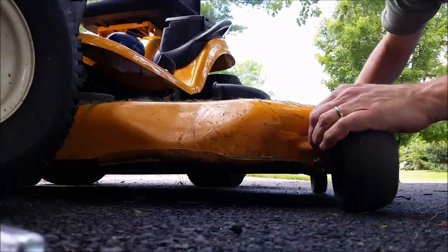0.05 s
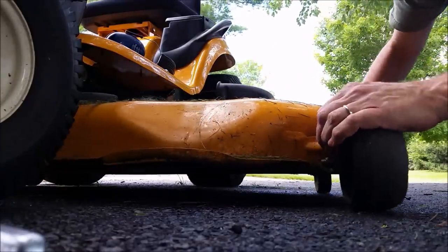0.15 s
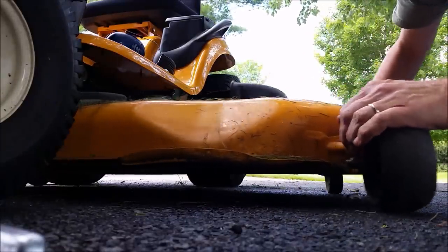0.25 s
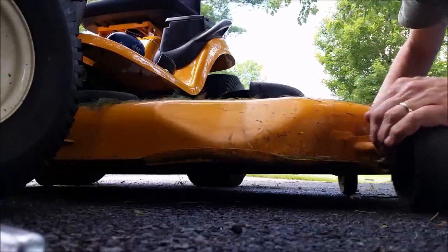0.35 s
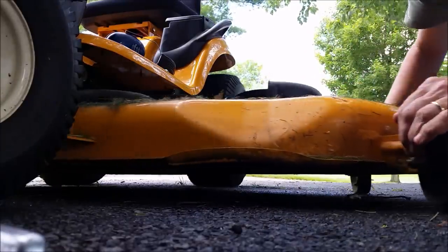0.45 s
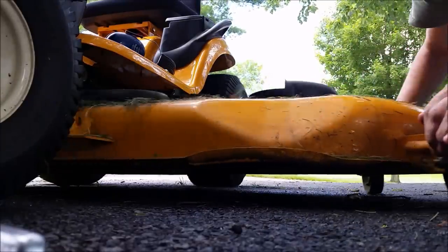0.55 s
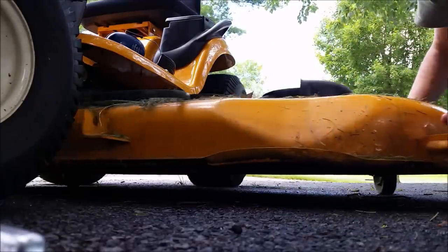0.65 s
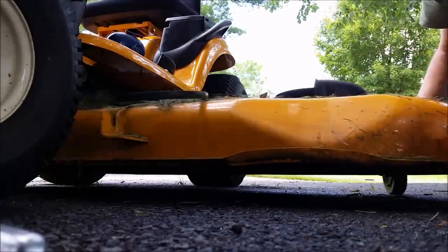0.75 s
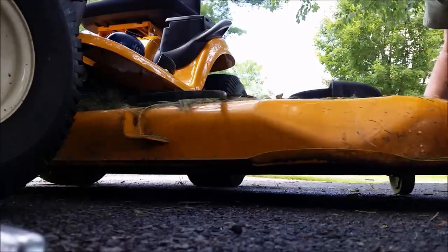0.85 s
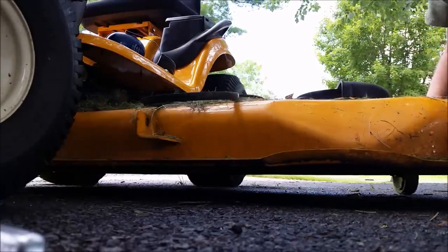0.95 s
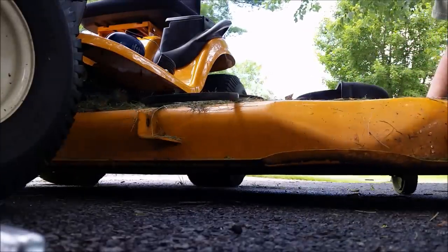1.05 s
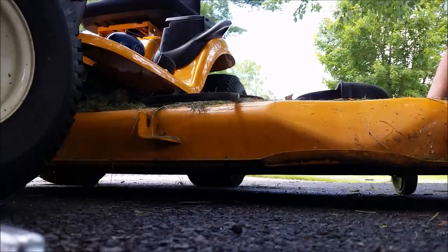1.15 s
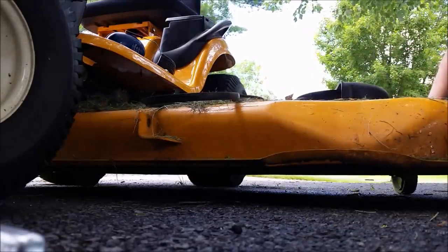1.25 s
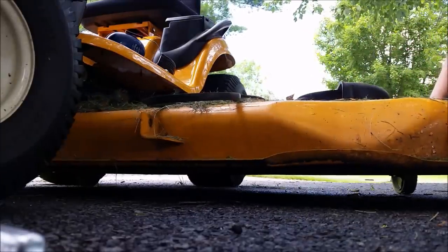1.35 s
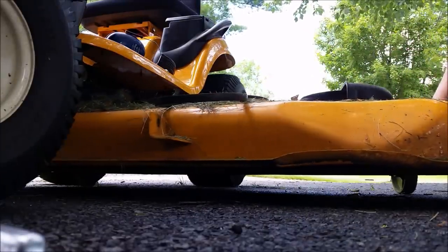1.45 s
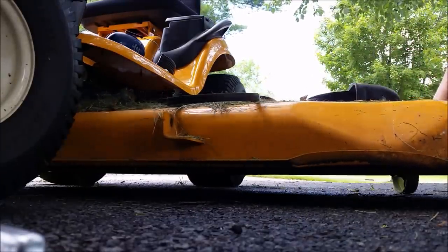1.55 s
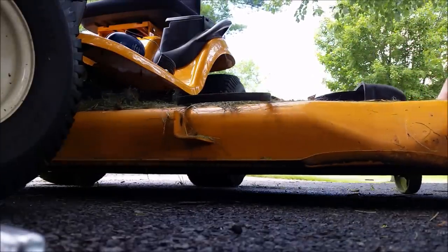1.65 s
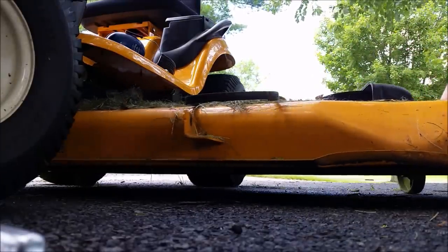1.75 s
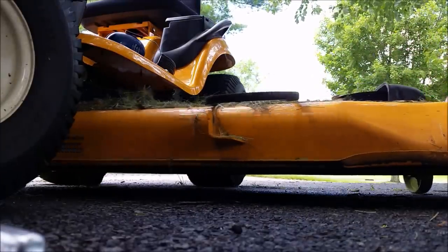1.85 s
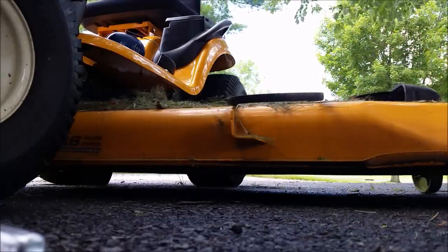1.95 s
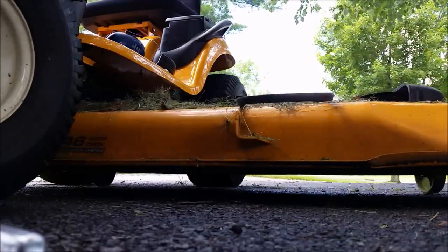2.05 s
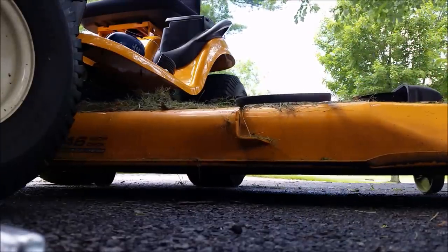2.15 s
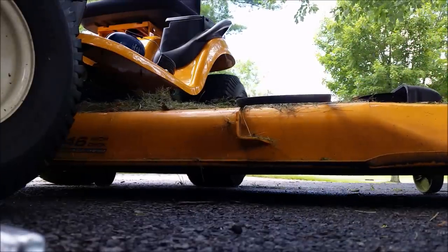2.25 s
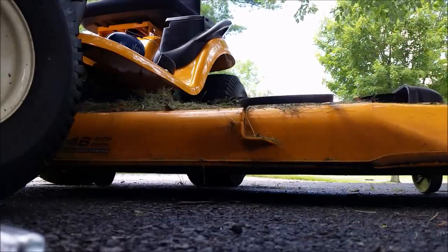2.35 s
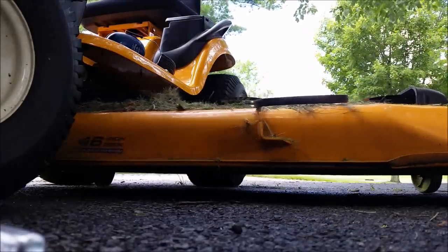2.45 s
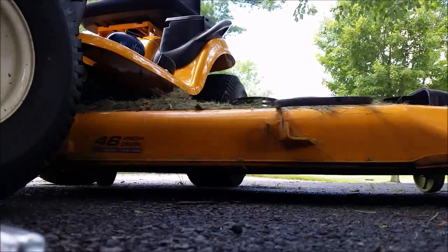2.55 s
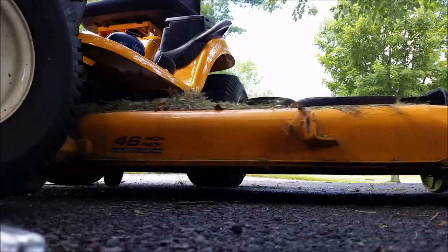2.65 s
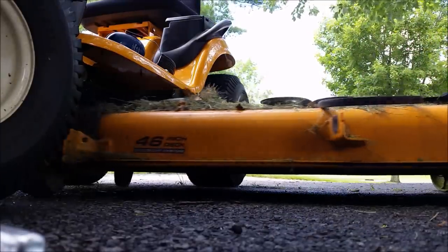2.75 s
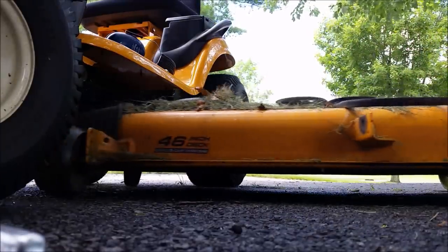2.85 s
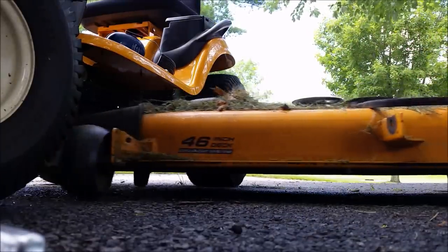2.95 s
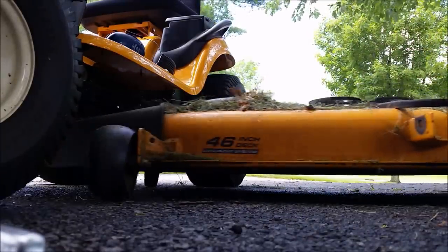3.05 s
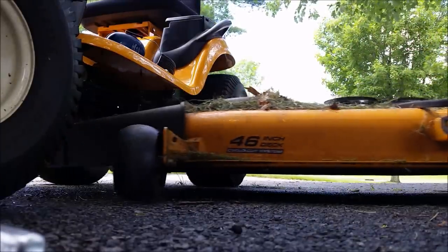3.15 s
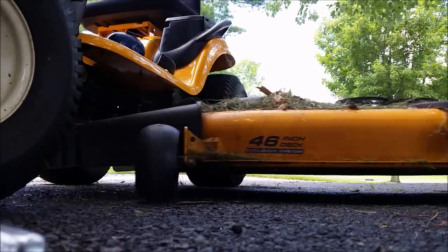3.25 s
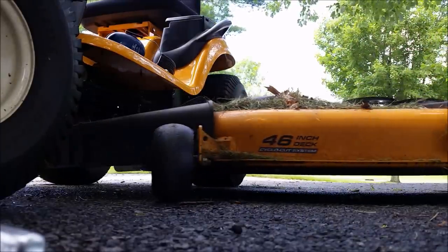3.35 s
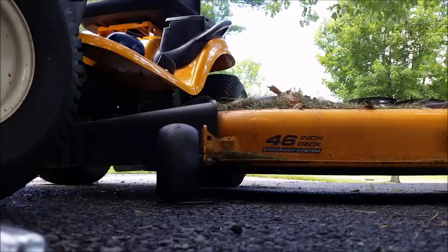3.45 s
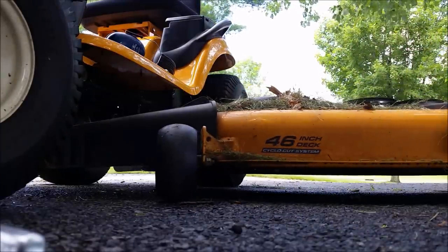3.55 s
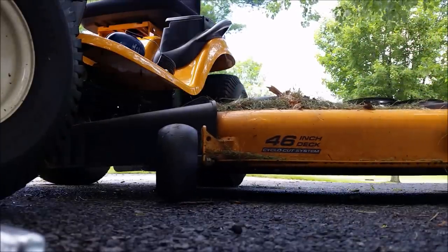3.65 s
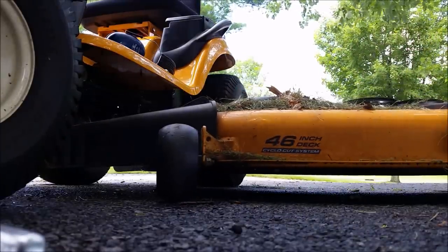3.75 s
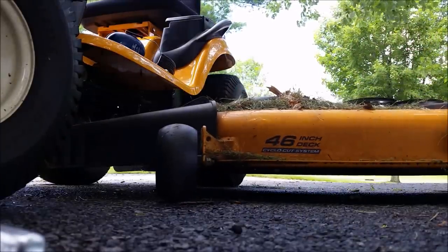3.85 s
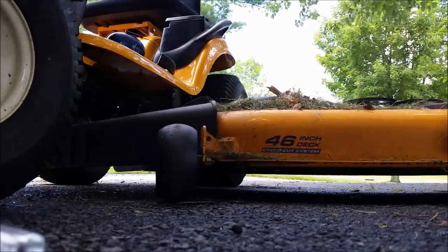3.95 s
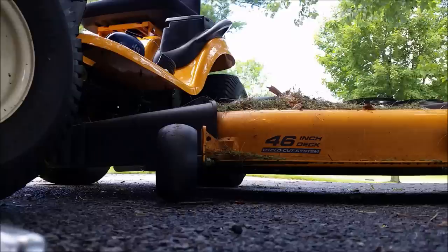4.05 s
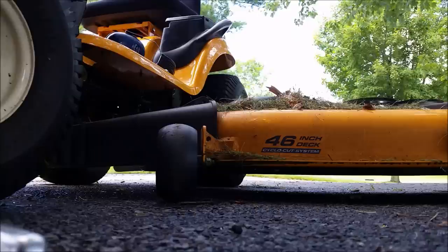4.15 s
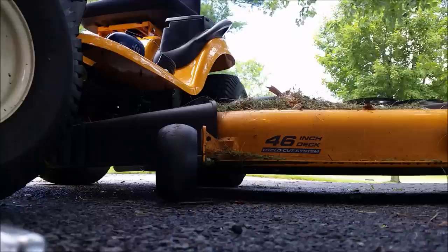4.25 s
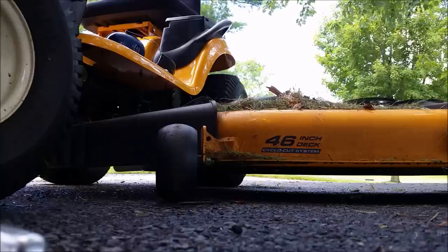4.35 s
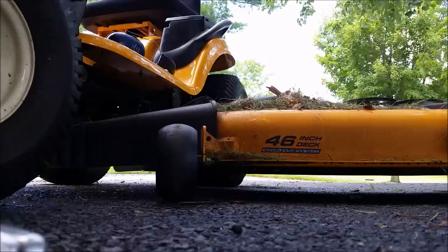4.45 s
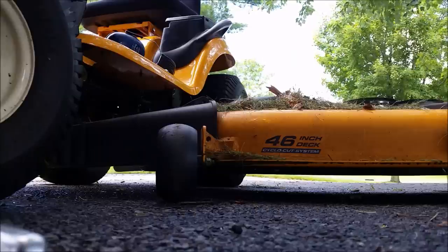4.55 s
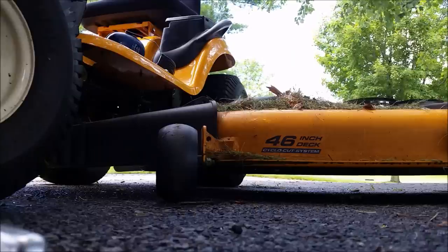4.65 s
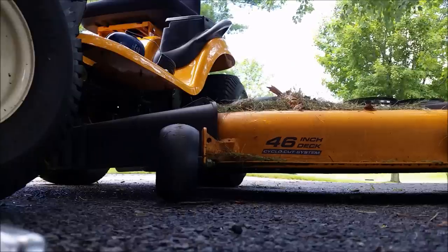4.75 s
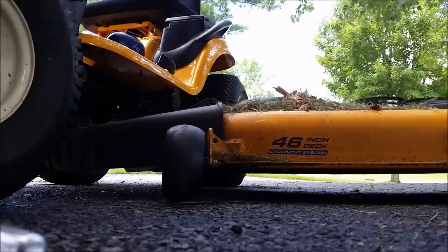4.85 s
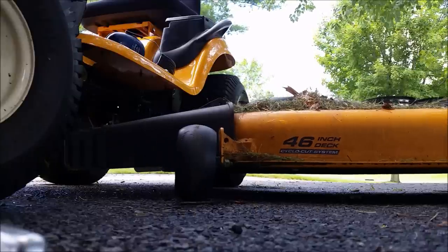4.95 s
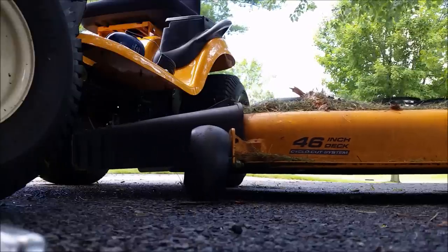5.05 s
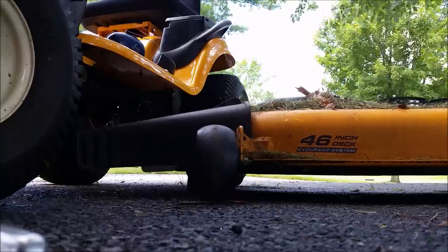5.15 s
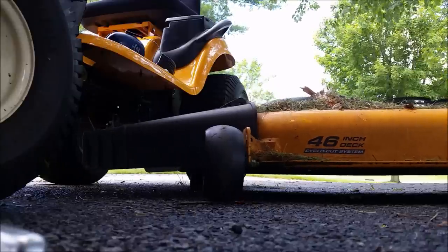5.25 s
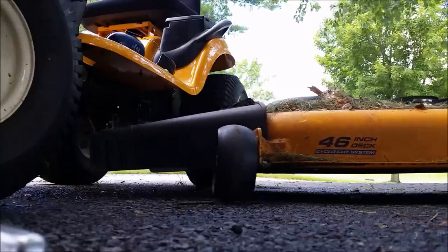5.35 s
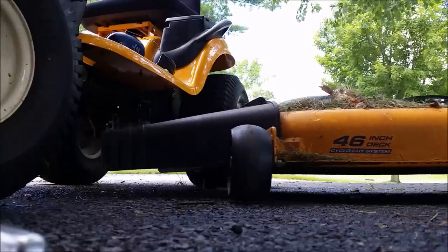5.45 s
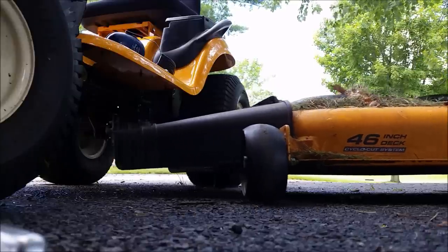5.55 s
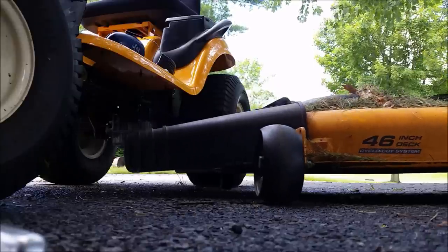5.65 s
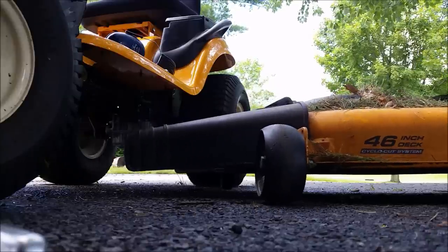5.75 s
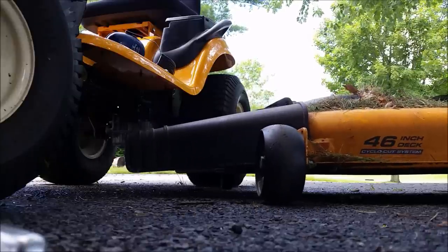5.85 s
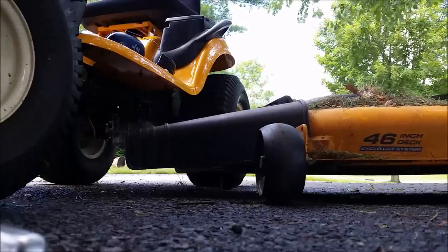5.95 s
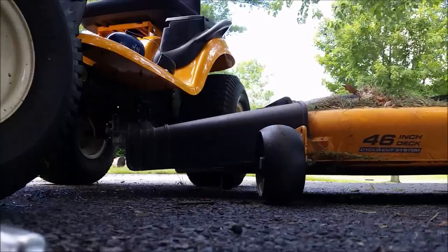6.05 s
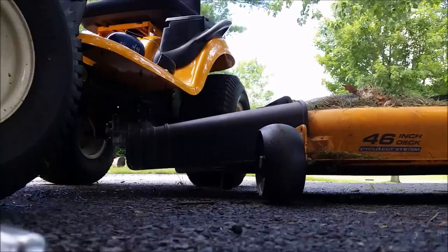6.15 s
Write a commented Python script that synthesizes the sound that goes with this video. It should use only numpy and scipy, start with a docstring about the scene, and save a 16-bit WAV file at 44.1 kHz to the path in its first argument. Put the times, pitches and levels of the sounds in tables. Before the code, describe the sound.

Close to the ground outdoors, a heavy steel mower deck is hauled over rough asphalt in uneven drags. The hollow shell judders and booms, small wheels scrape drily, grit crunches and stones crack. Loose parts clack. A long pull near the middle is the fullest; then a quieter pause with soft wind puffs, and a last set of short, knocking jerks.

```python
"""On rough asphalt, close to a two-port microphone, a heavy steel mower deck is pulled in several drags.
Its wheels judder over the stones: random jolts ring the steel shell and scrape the wheel brackets.
Grit crunches as clumped noise grains and cracking bursts; loose parts knock with a tap, clack and ring.
Stones scratch the steel as short noise bands and dry grit snaps as spikes.
Light wind puffs the left port over low rumble and a faint shaped-noise hiss."""
import sys
import numpy as np
from scipy import signal
from scipy.fft import rfft, irfft, next_fast_len
from scipy.io import wavfile
from scipy.ndimage import uniform_filter1d

SR = 44100
rng = np.random.default_rng(int(sys.argv[2]) if len(sys.argv) > 2 else 0)


def ratio_of_db(decibels):
    """Turn decibels (scalar or array-like) into linear amplitude factors; 0 dB maps to 1."""
    return 10 ** (np.asarray(decibels, float) / 20)


def dump(signal):
    """Clip the signal to [-1, 1] and save it as 16-bit WAV at the path in sys.argv[1]."""
    limited = np.clip(np.atleast_2d(signal).T, -1, 1)
    pcm = np.round(limited * 32767).astype(np.int16)
    wavfile.write(sys.argv[1], SR, pcm)


N = 274160  # length in samples

# colour of breaking stone: frequency_hz, relative_level_db
STONE_COLOUR = [(880, -42), (1500, 2), (2400, 4.5), (3800, -0.5), (4900, -1.5), (7700, -3), (10600, 5),
                (13400, -4.5), (15600, -7), (16500, -42)]
# left-right balance of sounds from the steel: frequency_hz, left_minus_right_db
STEEL_BALANCE = [(60, -0.5), (180, -1), (550, -0.5), (1650, -1.5), (4970, -7), (15000, 5)]


def evened(x):
    """Scales to rms 1."""
    return x / np.sqrt(np.mean(x ** 2) + 1e-20)


def read(points, hz):
    """Value of a spectrum table on a log-frequency axis."""
    f, value = np.transpose(points)
    return np.interp(np.log(hz + 1), np.log(f + 1), value)


def colour(x, points):
    """Filters by a table of dB over frequency."""
    n = next_fast_len(x.shape[-1])
    gain = ratio_of_db(read(points, np.fft.rfftfreq(n, 1 / SR)))
    return irfft(rfft(x, n) * gain, n)[..., :x.shape[-1]]


def leaned(x, points):
    """Tilts a pair left or right by a table of dB over frequency, half on each port."""
    left = colour(x[0], [(f, db / 2) for f, db in points])
    right = colour(x[1], [(f, -db / 2) for f, db in points])
    return np.array([left, right])


def narrowed(x):
    """Weakens the left-right difference in the treble, above about 6 kHz."""
    # frequency_hz, side_gain_db
    side_gain = [(6000, 0.5), (9000, -5.5), (15000, -9)]
    mid = (x[0] + x[1]) / 2
    side = colour((x[0] - x[1]) / 2, side_gain)
    return np.array([mid + side, mid - side])


def add(mix, s, sound):
    """Mixes a sound in at second s."""
    part = mix[:, round(s * SR):][:, :sound.shape[1]]
    part += sound[:, :part.shape[1]]


def ring(modes, factor=1, size=8192):
    """Struck modes as dying sines of random sign; factor scales their pitch."""
    t = np.arange(size) / SR
    out = np.zeros(size)
    for hz, db, t60 in modes:
        decay = ratio_of_db(db - 60 * t / max(t60, 0.005))
        out += rng.choice([-1, 1]) * decay * np.sin(2 * np.pi * hz * factor * t)
    return out


def crunchy(x, coarse_db):
    """Colour of breaking stone; coarser pieces sound stronger below 6 kHz."""
    x = colour(x, STONE_COLOUR)
    low = colour(x, [(5000, 0), (7500, -30)])
    return x + (ratio_of_db(coarse_db) - 1) * low


def strokes(s, held, db, rise, fall, sag=0):
    """Rise, hold and fall of each stroke as gain, strokes x samples; slopes in dB per s."""
    t = np.arange(N) / SR - np.reshape(s, (-1, 1))
    held, db, rise = (np.reshape(v, (-1, 1)) for v in (held, db, rise))
    before = rise * np.minimum(t, 0)
    during = sag * np.clip(t, 0, held)
    after = fall * np.maximum(t - held, 0)
    return ratio_of_db(db + before - during - after)


def power_sum(gains):
    """Unrelated strokes add in power."""
    return np.sqrt((gains ** 2).sum(0) + 1e-12)


def following(judder, db, follow):
    """Gain that is db at a judder of -20 dB and moves by follow dB per dB of judder."""
    return ratio_of_db(db) * (10 * judder) ** follow


def pull():
    """Gains of shell judder, shell boom and wheel scrape over all drags, nudges, thumps and rasps."""
    # drags: full_speed_s, held_s, judder_db, rise_db_per_s, scrape_against_judder_db
    drags = [(0.312, 0.62, -16.5, 355, -9), (1.038, 0.0029, -15, 106, -11), (1.64, 0.04, -21, 127, -8.5),
             (1.97, 0.11, -14.5, 85, -10), (2.559, 0.8, -16.5, 174, -7.5), (3.499, 0.0093, -23, 113, -11.5),
             (4.8, 0.05, -59, 27, -10), (4.998, 0.03, -17, 196, -7.5), (5.2, 0.0092, -33, 100, -0.5),
             (5.44, 0.012, -26.5, 89, -5), (5.56, 0.21, -21, 200, -3.5)]
    # brief nudges of the deck: time_s, judder_db, scrape_against_judder_db
    nudges = [(0.025, -34, -11), (3.781, -36.5, 2), (4.835, -41.5, -17), (5.271, -28.5, 0),
              (5.928, -29.5, -27), (6.045, -31.5, 0), (6.128, -37.5, 4), (6.182, -34, 0)]
    # wheels rasping over a rough patch: start_s, held_s, scrape_db
    rasps = [(0.345, 0.049, -23.5), (0.405, 0.012, -22.5), (0.45, 0.04, -18.5), (0.552, 0.011, -16),
             (0.727, 0.012, -16), (0.81, 0.015, -16), (1.04, 0.016, -22), (2.02, 0.015, -18.5),
             (2.558, 0.01, -20), (2.62, 0.014, -20.5), (2.91, 0.17, -19.5), (3.055, 0.011, -33),
             (3.09, 0.011, -18.5), (3.207, 0.044, -17), (3.329, 0.043, -20.5), (3.43, 0.078, -26.5),
             (4.93, 0.08, -31.5), (5.04, 0.026, -23.5), (5.552, 0.029, -23.5), (5.64, 0.025, -22.5),
             (5.768, 0.05, -20.5)]
    # the whole shell thumping down: time_s, boom_db
    thumps = [(2.06, -14.5), (2.24, -27.5), (2.3, -27.5), (2.7, -14.5), (2.9, -13), (3.79, -33), (5.0, -24),
              (5.21, -24), (5.57, -18), (5.66, -19)]

    full_speed, held, drag_db, rise, drag_scrape_db = np.transpose(drags)
    # the pull tires while held, then the deck rolls out
    drag_gains = strokes(full_speed, held, drag_db, rise, fall=108, sag=2.5)
    at, nudge_db, nudge_scrape_db = np.transpose(nudges)
    nudge_gains = strokes(at, 0, nudge_db, rise=598, fall=361)
    moves = np.vstack([drag_gains, nudge_gains])
    judder = np.hypot(power_sum(moves), ratio_of_db(-52.5))  # faint floor at rest

    scrape_share = ratio_of_db(np.r_[drag_scrape_db, nudge_scrape_db])[:, None]
    steady_scrape = power_sum(moves * scrape_share)
    rasp_gains = strokes(*np.transpose(rasps), rise=800, fall=420)
    scrape = np.hypot(steady_scrape, power_sum(rasp_gains))

    at, thump_db = np.transpose(thumps)
    thump_gains = strokes(at, 0, thump_db, rise=398, fall=227)
    boom = np.hypot(following(judder, -23.5, 0.78), power_sum(thump_gains))
    return judder, boom, scrape


def hiss():
    """Faint steady hiss: unrelated shaped noise at the two ports, narrowed in the treble."""
    # frequency_hz, relative_level_db
    hiss_colour = [(180, -32), (300, -23), (584, 0), (678, 4), (737, 0), (978, -1.5), (2320, -13),
                   (3520, -7.5), (3850, -1.5), (4350, -3.5), (6520, -30), (9880, -7.5), (12500, -12.5),
                   (16000, -12)]
    # frequency_hz, left_minus_right_db
    hiss_balance = [(60, 8.5), (130, -7.5), (290, -15), (640, -0.5), (1410, -4), (3100, 17), (6820, 7),
                    (15000, -6)]
    noise = colour(rng.standard_normal((2, N)), hiss_colour)
    return ratio_of_db(-46) * evened(narrowed(leaned(noise, hiss_balance)))


def wind_and_rumble(judder):
    """Lumpy low noise of wind and rolling; the rumble swells with the pull."""
    # frequency_hz, relative_level_db
    gust_colour = [(20, -29), (40, -3.5), (72, 10), (120, 7.5), (170, -2.5), (400, -91)]
    lumps = ratio_of_db(1.1 * evened(uniform_filter1d(rng.standard_normal(N), 2000)))
    a, b = colour(rng.standard_normal((2, N)) * lumps, gust_colour)
    low_noise = evened(np.array([a, 0.58 * a + 0.32 * b]))
    wind_gain, rumble_gain = ratio_of_db(-40), following(judder, -32, 0.85)
    return low_noise * np.hypot(wind_gain, rumble_gain)


def wind_puffs():
    """Single puffs, mostly on the left port: a cycle and a half of 70 Hz pressure in a smooth window."""
    # start_s, level_db (before the gain of each port)
    puffs = [(3.677, -30), (3.909, -30), (3.998, -29), (4.037, -27), (4.199, -31), (4.255, -31),
             (4.307, -24.5)]
    out = np.zeros((2, N))
    cycles = np.arange(0, 1.5, 70 / SR)
    puff = np.sin(2 * np.pi * cycles) * np.hanning(len(cycles))
    for s, db in puffs:
        add(out, s, ratio_of_db(db) * np.array([2.3 * puff, 0.079 * puff]))
    return out


def scratches():
    """Stones score the steel: short bright chirrs of dying band noise."""
    # start_s, level_db, centre_hz
    chirrs = [(0.456, -36, 5200), (0.633, -27.5, 2680), (0.726, -36, 5000), (0.822, -30, 5200),
              (1.03, -21, 3060), (1.045, -24.5, 5970), (1.559, -31, 2120), (1.598, -33, 2170),
              (1.63, -29, 2360), (2.864, -17, 5960), (2.904, -18.5, 2300), (3.054, -19.5, 4240),
              (3.174, -20, 1900), (4.94, -32, 2700), (4.99, -28, 2600), (5.183, -31, 2900),
              (5.257, -27, 4460), (5.526, -32, 4300), (5.552, -27, 4070), (5.581, -28, 6240),
              (5.635, -30, 5100), (5.638, -26, 3000), (5.71, -23, 4650), (5.765, -31, 2600),
              (6.032, -36.5, 2770), (6.122, -54, 4500)]
    out, t = np.zeros((2, N)), np.arange(3000) / SR
    reach = 1 + 0.45  # band skirts as a factor of the centre
    for s, db, hz in chirrs:
        band = [(hz / reach, -30), (hz, 0), (hz * reach, -30)]
        a, b, c = colour(rng.standard_normal((3, len(t))), band)
        noise = evened(np.array([a + b, a + c]))
        envelope = ratio_of_db(db - 60 * t / 0.056) * np.minimum(t / 0.00066, 1)
        add(out, s, envelope * noise)
    return leaned(out, STEEL_BALANCE)


def snaps():
    """Dry grit snaps: a sharp spike with a dying noise tail, almost alike at both ports."""
    # time_s, peak_db (before the left-right balance)
    breaks = [(2.24, -22.5), (2.353, -23), (2.3668, -15.5), (2.388, -25), (2.394, -28), (2.408, -17),
              (2.4172, -20), (4.437, -24.5)]
    out, t = np.zeros((2, N)), np.arange(3000) / SR
    lead = 44  # samples of room ahead of the spike for the filter
    for s, db in breaks:
        a, b, c = rng.standard_normal((3, len(t))) * ratio_of_db(-60 * t / 0.016)
        a[0] = 3.4  # the break itself is one sharp spike
        pair = np.roll([a + 0.24 * b, a + 1.0 * c], lead, axis=1)
        snap = crunchy(pair, 4.0)
        add(out, s - lead / SR, ratio_of_db(db) * snap / abs(snap).max())
    return leaned(out, STEEL_BALANCE)


def knocks():
    """A loose part gives a sharp tap, a dull clack and a brief ring, a little unlike at the two ports."""
    # start_s, level_db, ring_pitch_hz, ring_share (0-1, in power, against tap and clack)
    hits = [(0.729, -19.5, 850, 0.3), (0.798, -24, 1180, 0.6), (1.029, -12, 1060, 0.01),
            (1.048, -20, 1207, 0.5), (1.559, -27, 1275, 0.06), (1.598, -24.5, 1100, 0.08),
            (1.719, -31, 1110, 0), (1.785, -33, 1300, 0.07), (2.463, -27.5, 920, 0.17),
            (2.516, -31, 870, 0.5), (2.546, -21, 880, 0.64), (2.904, -9, 870, 0.01),
            (3.154, -20, 843, 0.55), (3.487, -24.5, 1650, 0.38), (4.951, -17.5, 905, 0),
            (5.086, -10.5, 1130, 0), (5.183, -18.5, 860, 0.01), (5.258, -15.5, 1650, 0.13),
            (5.267, -25.5, 634, 0.64), (5.297, -42, 1650, 0.7), (5.379, -30.5, 1650, 0.18),
            (5.527, -16.5, 883, 0.13), (5.634, -9, 1060, 0), (5.694, -22.5, 2010, 0.1),
            (5.711, -10.5, 2060, 0.03), (6.033, -32, 876, 0.05), (6.122, -24, 2110, 0.03), ]
    # ring modes of a loose part: multiple_of_pitch, relative_level_db, t60_s
    part_modes = [(1.001, 10.5, 0.043), (1.27, 2.5, 0.044), (1.8, -21, 0.038), (2.6, -7, 0.017),
                  (3.7, -34, 0.009)]
    # frequency_hz, relative_level_db
    clack_colour = [(150, 2), (500, 20.5), (1200, 6.5), (2500, 1), (5000, -5.5), (12000, -24)]
    out, t = np.zeros((2, N)), np.arange(3000) / SR
    tap = 1.55 * np.sin(2 * np.pi * 1900 * t) * ratio_of_db(-60 * t / 0.0072)  # first contact
    for s, db, hz, share in hits:
        a, b, c = colour(rng.standard_normal((3, 3000)), clack_colour)
        clack = evened(np.array([a + 1.1 * b, a + 1.34 * c])) * ratio_of_db(-60 * t / 0.15)
        share = np.clip(share, 0, 1)
        ringing = np.sqrt(share) * ring(part_modes, hz, size=3000)
        dull = 0.45 * np.sqrt(1 - share) * (clack + tap)
        add(out, s, ratio_of_db(db) * (ringing + dull))
    return out * ratio_of_db([[-1.5], [1.5]])


def grit(judder):
    """Fine grains break in clumps at many spots; larger stones crack as short bursts."""
    # grinding under a shoe or skidding wheel: start_s, held_s, level_db, coarseness_db (added below 6 kHz)
    crunches = [(0.01, 0.023, -33.5, -7), (0.96, 0.061, -36.5, -2), (1.19, 0.092, -45.5, 1),
                (1.84, 0.096, -36, -2), (1.96, 0.096, -36, -10), (2.377, 0.04, -35.5, 4),
                (2.62, 0.025, -44, -14), (2.73, 0.01, -33, -3), (3.039, 0.036, -31, 1.5),
                (3.2, 0.026, -34.5, 7), (3.25, 0.029, -34, 10), (3.34, 0.0087, -34, 11),
                (3.6, 0.036, -43, -6), (3.769, 0.017, -35, 0.5), (3.958, 0.0045, -43, 0),
                (4.44, 0.094, -48, -3.5), (5.3, 0.084, -41, -1), (6.11, 0.022, -39, 1.5)]
    # single stones cracking: time_s, nominal_peak_db, coarseness_db (added below 6 kHz)
    cracks = [(0.046, -18, -25), (1.193, -19.5, -3), (1.481, -23, 3), (1.623, -6.5, -4), (1.834, -23, -19),
              (2.607, -21, -5), (2.634, -9.5, -22), (2.6475, -6.5, -21), (2.7252, -10, -5),
              (2.8517, -10.5, -10), (2.864, -7.5, -1), (2.9205, -13.5, 0), (3.057, -8.5, 5),
              (3.2087, -12.5, -9), (3.342, -15, 3), (3.646, -16, -2), (5.0942, -16.5, 10),
              (5.5822, -24.5, 15), (5.782, -14.5, 5)]
    # frequency_hz, left_minus_right_db
    grit_balance = [(1500, -3.5), (5000, -13.5), (9000, -6.5), (14000, 1)]

    s, held, db, coarse = np.transpose(crunches)
    ground = strokes(s, held, db, rise=493, fall=294)
    rolling = following(judder, -45.5, 0.33)  # grit under the rolling wheels
    ground = np.vstack([ground, rolling])
    level = power_sum(ground)
    coarse_db = np.r_[coarse, 0.5] @ ground ** 2 / level ** 2  # power-weighted; 0.5 dB for rolling

    sizes = ratio_of_db(4.5 * np.minimum(rng.exponential(1, N), 3))
    grains = sizes * (rng.random(N) < 3000 / SR)  # 3000 grains per s
    grains *= ratio_of_db(2.9 * evened(uniform_filter1d(rng.standard_normal(N), 300)))  # clumps
    spot, bed = rng.integers(0, 12, N), np.zeros((2, N))
    t = np.arange(1500) / SR
    for k in range(12):
        echoes = rng.standard_normal((3, 1500)) * ratio_of_db(-60 * t / 0.012)  # off ground and shell
        echoes *= np.minimum(t / 0.0012, 1)
        paths = echoes[0] + 6.4 * echoes[1:]  # shared echo plus one of each port's own
        bed += signal.oaconvolve((grains * (spot == k))[None], paths, axes=1)[:, :N]

    unit = np.std(colour(rng.standard_normal(SR), STONE_COLOUR))  # rms that the colour gives white noise
    out = level * crunchy(evened(narrowed(bed)), coarse_db) / unit
    t = np.arange(4410) / SR
    crest = 6.9  # peaks of noise stand this far over its rms
    for s, db, coarse in cracks:
        envelope = ratio_of_db(-60 * (t - 0.002) / 0.078) * np.clip(t / 0.0023 - 0.5, 0, 1)
        burst = rng.standard_normal((3, len(t))) * envelope
        crack = crunchy(burst[0] + 1.8 * burst[1:], coarse)
        add(out, s - 0.002, ratio_of_db(db) * crack / unit / crest)
    return leaned(out, grit_balance)


def contacts(per_s, spread_db, spectrum, t60, modes, ringing, clump_db, count):
    """Random jolts at several contact points, each heard through its own path to either port."""
    # frequency_hz, left_right_likeness (-1 to 1)
    likeness = [(60, 0.19), (140, 1), (280, 0.93), (550, 0.69), (1650, -0.23), (4970, -0.44), (15000, 0.88)]
    t, out = np.arange(8192) / SR, np.zeros((2, N))
    same = np.clip(read(likeness, np.fft.rfftfreq(8192, 1 / SR)), -1, 1)
    for k in range(count):
        clumps = ratio_of_db(clump_db * evened(uniform_filter1d(rng.standard_normal(N), 1100)))  # stones in groups
        sizes = ratio_of_db(spread_db * np.minimum(rng.exponential(1, N), 3))
        jolts = sizes * (rng.random(N) < per_s / count / SR)
        jolts *= rng.choice([-1, 1], N) * clumps
        dense = colour(rng.standard_normal((2, 8192)), spectrum) * ratio_of_db(-60 * t / t60)
        shift = 1 + rng.uniform(-0.010998, 0.0094)  # pitch shifts with the spot that is struck
        point_modes = modes[k % len(modes)]
        a, b = rfft([evened(d) + ringing * evened(ring(point_modes, shift)) for d in dense])
        paths = irfft([a, same * a + np.sqrt(1 - same ** 2) * b])
        out += signal.oaconvolve(jolts[None], paths, axes=1)[:, :N]
    return evened(leaned(out, STEEL_BALANCE))


def deck(judder, booming, scrape):
    """The shell booms under the jolts; the wheels add a drier scrape, each spot ringing its own bracket."""
    # shell modes: frequency_hz, relative_level_db, t60_s
    shell_modes = [(103, -11.5, 0.16), (201.1, -2.5, 0.23), (222.2, -6.5, 0.15), (271.4, 0.5, 0.078),
                   (352.3, -3.5, 0.15), (413.3, 1, 0.08), (476, 6, 0.057), (522, -8, 0.12),
                   (587.6, -4.5, 0.087), (654.4, -9, 0.14), (802.7, -8, 0.17), (1054, -8.5, 0.11)]
    # shell between its modes: frequency_hz, relative_level_db
    judder_colour = [(24, -62), (40, -48), (97, -34), (158, -4.5), (200, -9), (303, -3.5), (404, 0.5),
                     (720, -17.5), (3000, -29), (3900, -88)]
    # wheel scrape: frequency_hz, relative_level_db
    scrape_colour = [(400, 1.5), (700, 12), (1150, 6), (1500, 4.5), (2200, -6.5), (3000, -10),
                     (3500, -15.5), (4500, -14.5), (5200, -9.5), (6000, -22), (8000, -67)]
    # short rings of the wheel brackets: pitch_hz
    bracket_pitches = [917, 1180, 1510, 1650, 2160, 2220, 2600, 3000]

    shell = contacts(1200, spread_db=5.0, spectrum=judder_colour, t60=0.092, modes=[shell_modes],
                     ringing=1.48, clump_db=0.66, count=6)
    boom = colour(shell, [(240, 0), (300, -30)])
    # the shell sounds hollower while it is still under the tractor
    hollow_hz = 423
    hollow = colour(shell, [(hollow_hz / 1.4, -30), (hollow_hz, 0), (hollow_hz * 1.4, -30)])
    hollow_db = np.maximum(5.5 - 4.5 * np.arange(N) / SR, 0)  # fades by 4.5 dB per s
    shell = shell + (ratio_of_db(hollow_db) - 1) * hollow

    brackets = [[(hz, 0, 0.03)] for hz in bracket_pitches]
    wheels = contacts(900, spread_db=3.0, spectrum=scrape_colour, t60=0.051, modes=brackets,
                      ringing=0.36, clump_db=3.5, count=8)
    return judder * evened(shell - boom) + booming * evened(boom) + scrape * wheels


def scene():
    """All sources at the two ports."""
    judder, boom, scrape = pull()
    background = hiss() + wind_and_rumble(judder) + wind_puffs()
    details = scratches() + snaps() + knocks()
    return background + details + grit(judder) + deck(judder, boom, scrape)


def low_pass(x):
    """Removes everything above the highest recorded frequency."""
    return signal.sosfilt(signal.butter(12, 16860, fs=SR, output="sos"), x)


def record(dry):
    """The microphone rounds off the loudest peaks and ends near 16 kHz."""
    rounded = 0.94 * np.tanh(dry / 1.014)
    finished = colour(rounded, [(15750, -0.5), (16150, -50)])
    return low_pass(finished)


dry = scene()
out = record(dry)
dump(out)
```